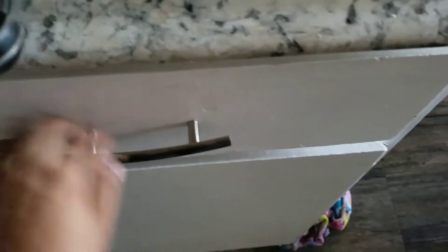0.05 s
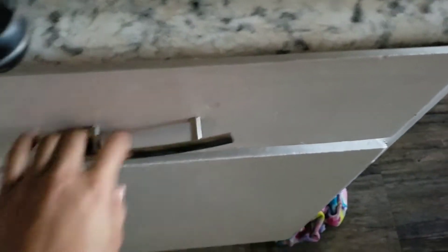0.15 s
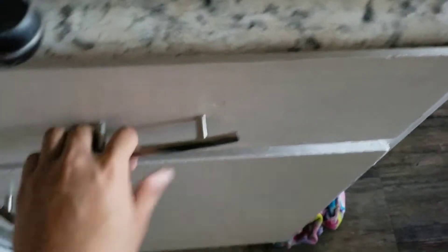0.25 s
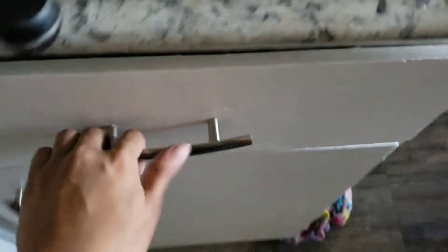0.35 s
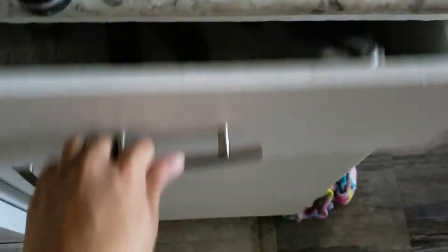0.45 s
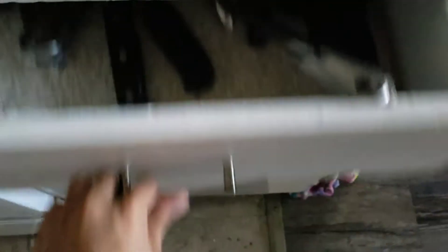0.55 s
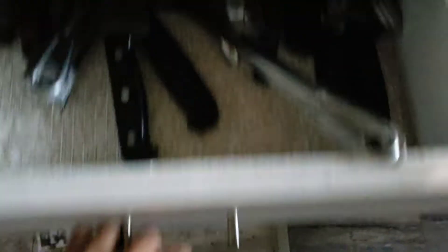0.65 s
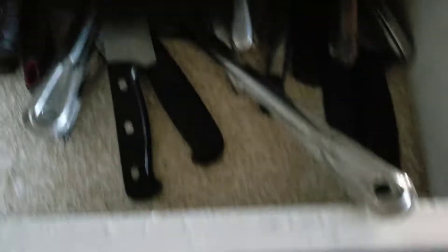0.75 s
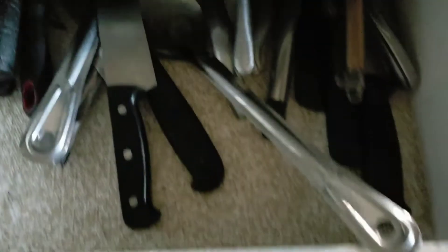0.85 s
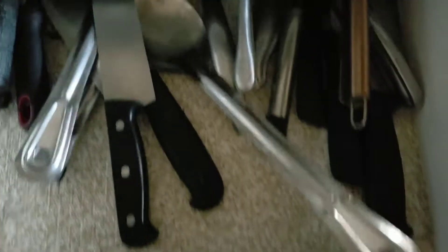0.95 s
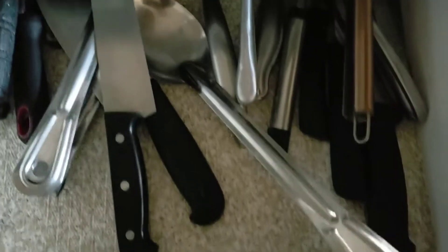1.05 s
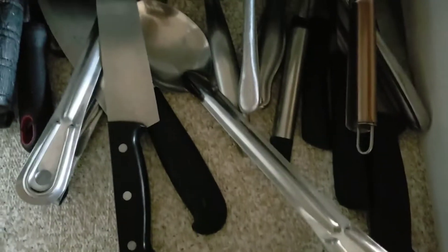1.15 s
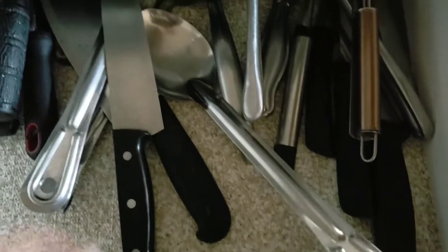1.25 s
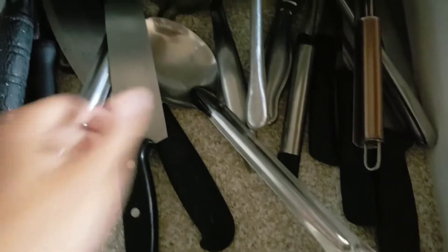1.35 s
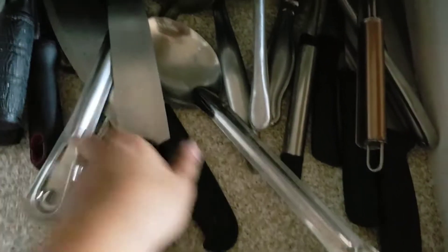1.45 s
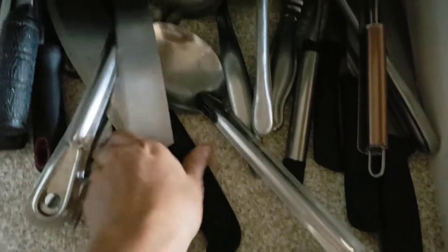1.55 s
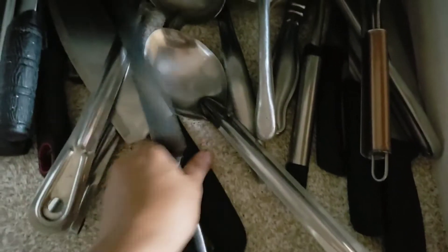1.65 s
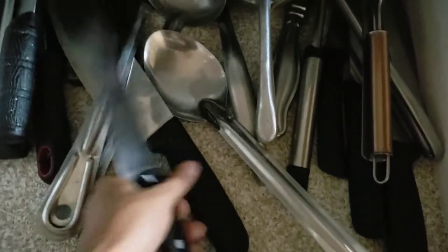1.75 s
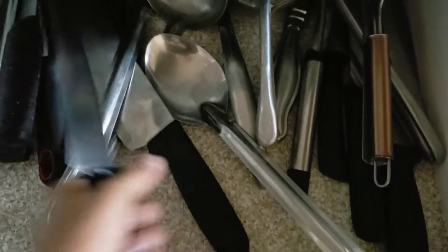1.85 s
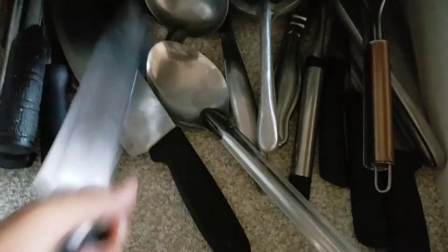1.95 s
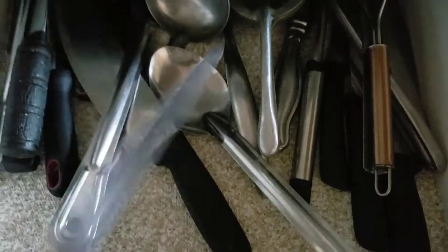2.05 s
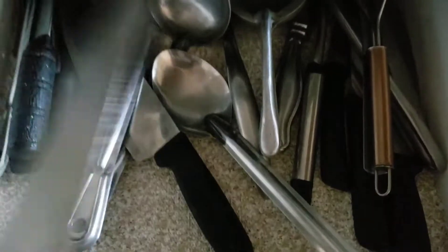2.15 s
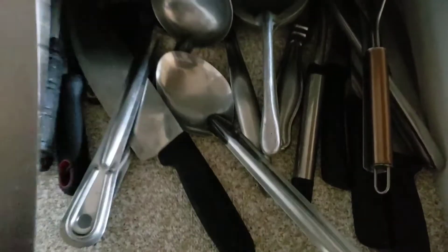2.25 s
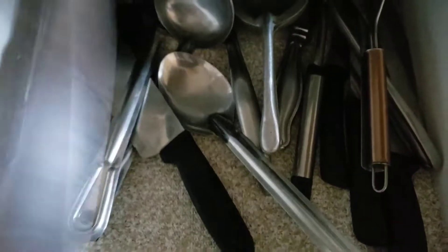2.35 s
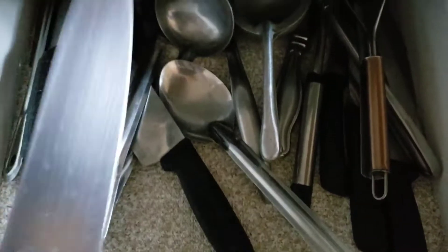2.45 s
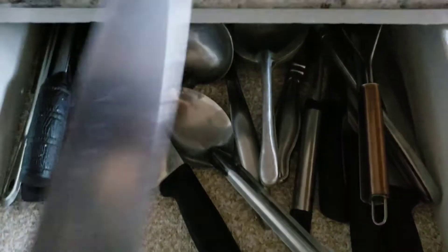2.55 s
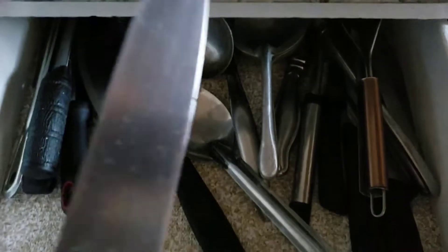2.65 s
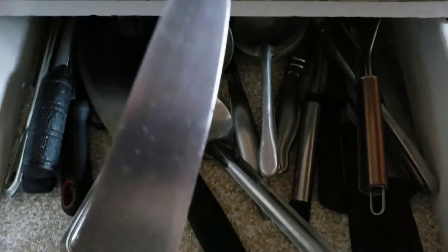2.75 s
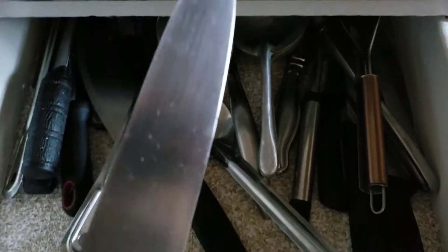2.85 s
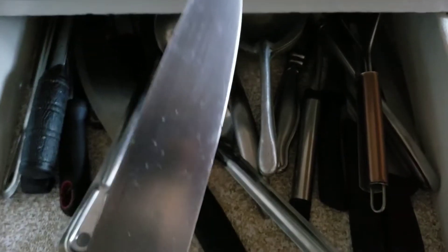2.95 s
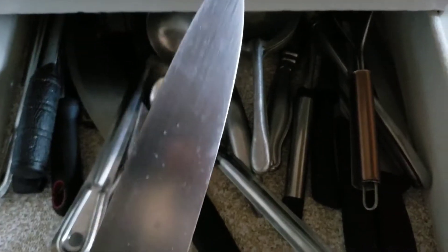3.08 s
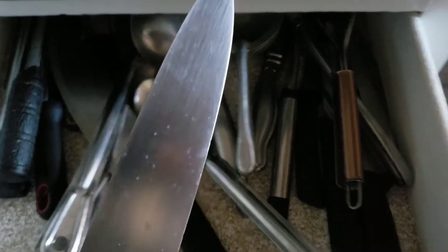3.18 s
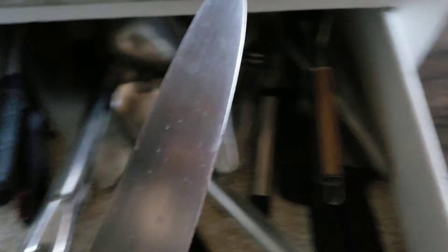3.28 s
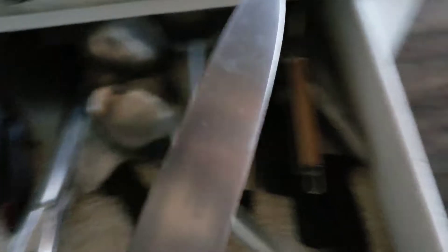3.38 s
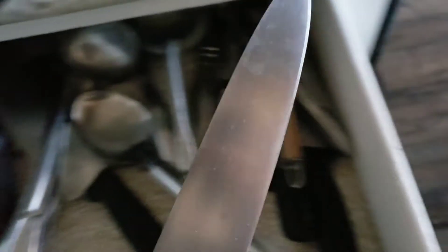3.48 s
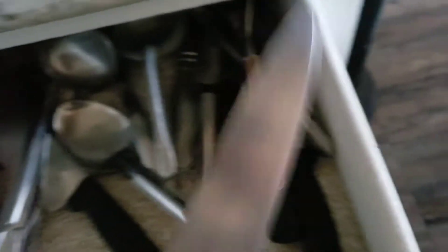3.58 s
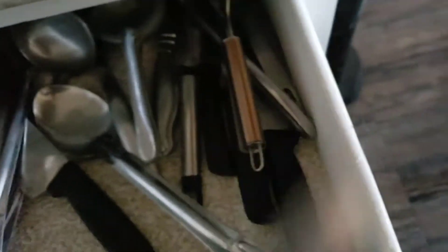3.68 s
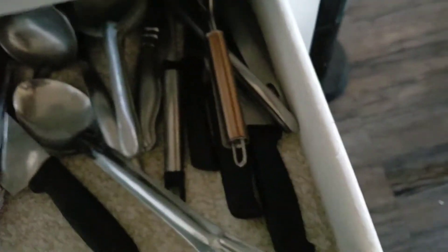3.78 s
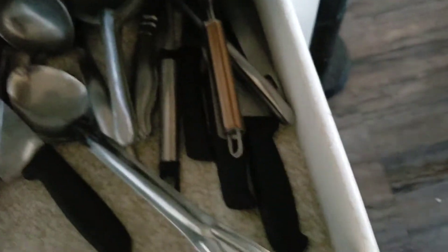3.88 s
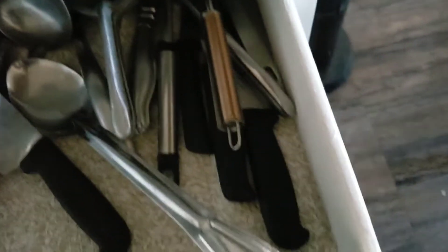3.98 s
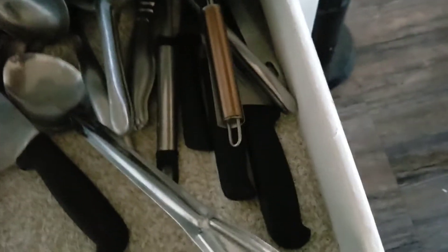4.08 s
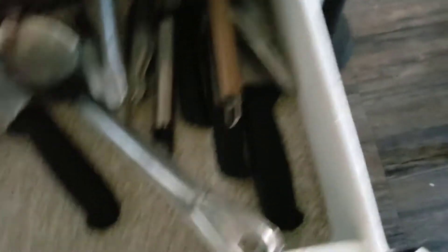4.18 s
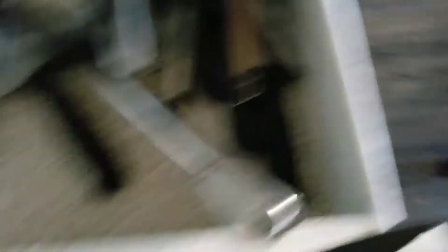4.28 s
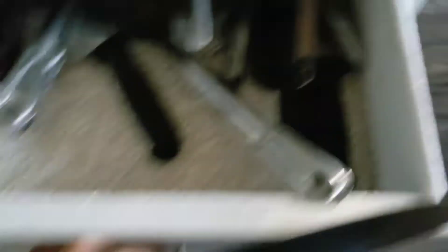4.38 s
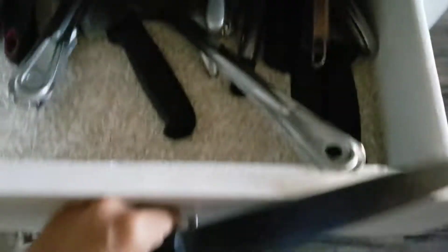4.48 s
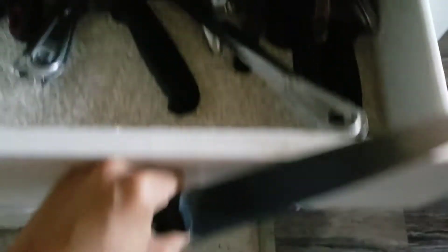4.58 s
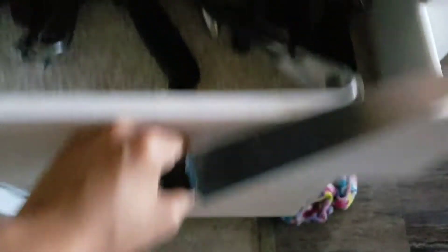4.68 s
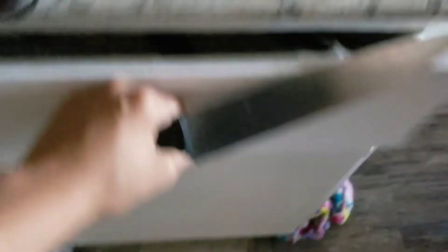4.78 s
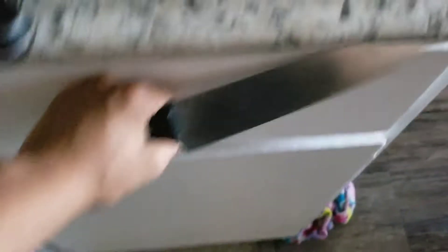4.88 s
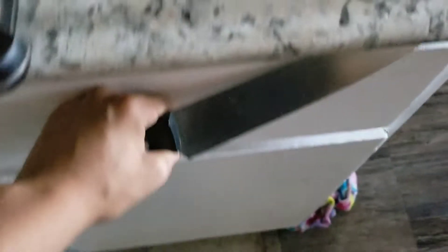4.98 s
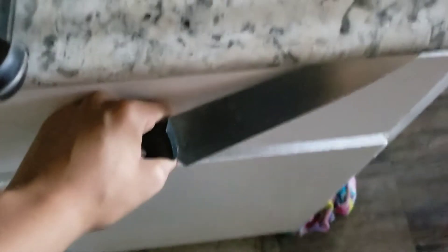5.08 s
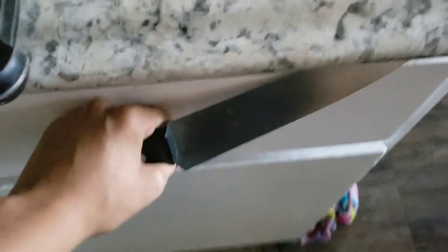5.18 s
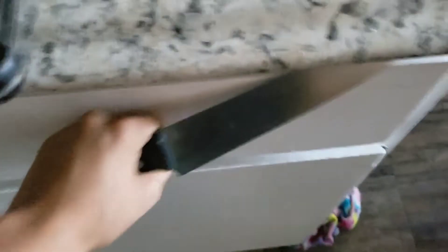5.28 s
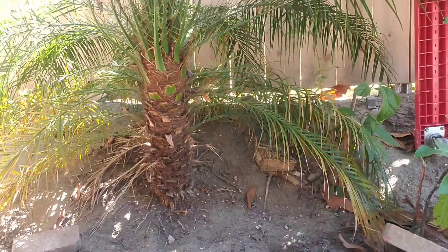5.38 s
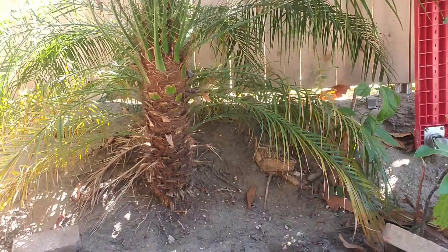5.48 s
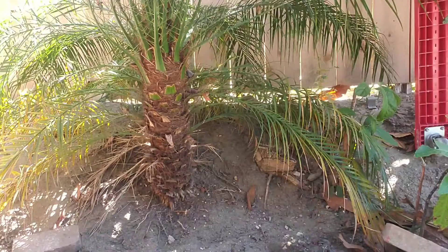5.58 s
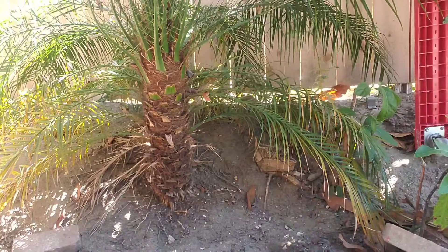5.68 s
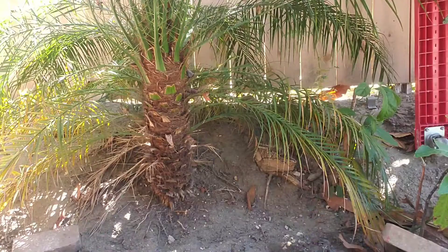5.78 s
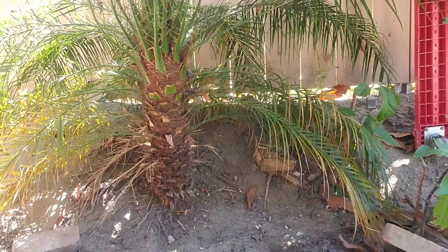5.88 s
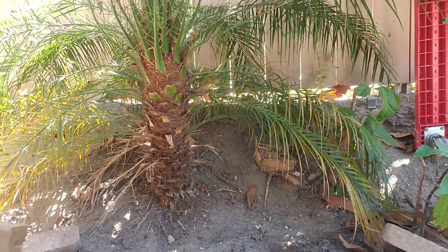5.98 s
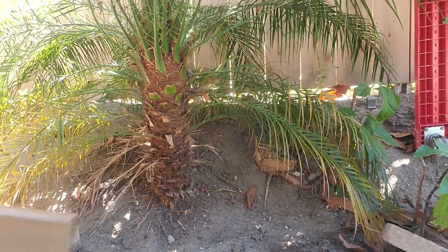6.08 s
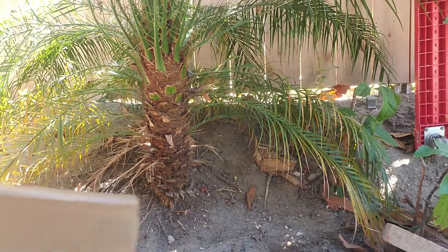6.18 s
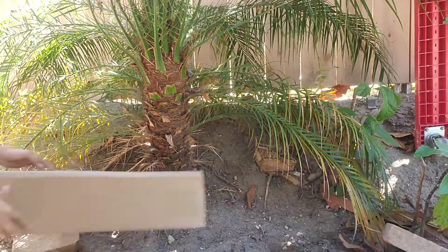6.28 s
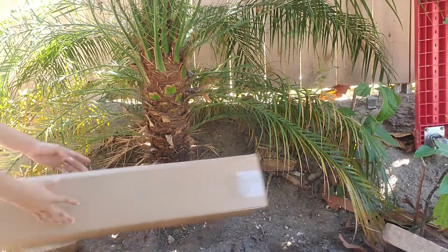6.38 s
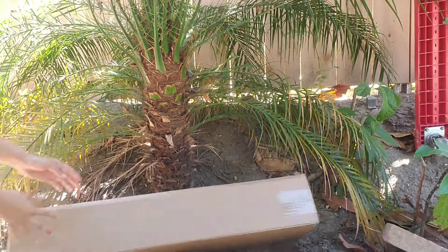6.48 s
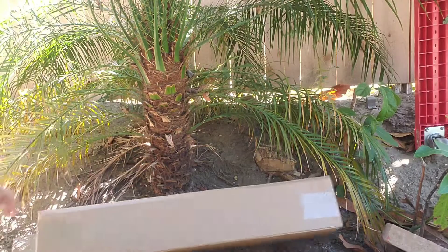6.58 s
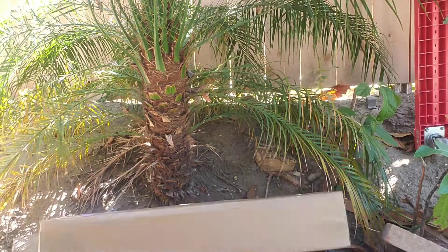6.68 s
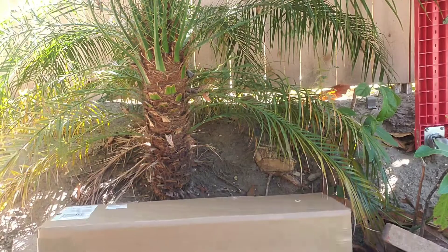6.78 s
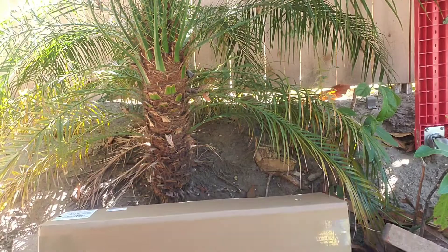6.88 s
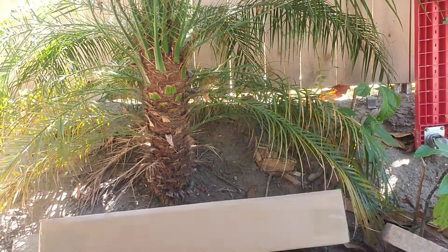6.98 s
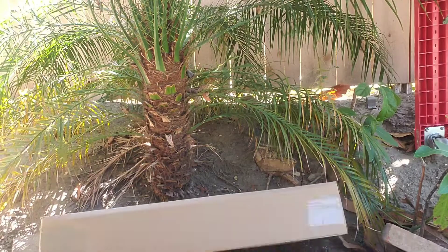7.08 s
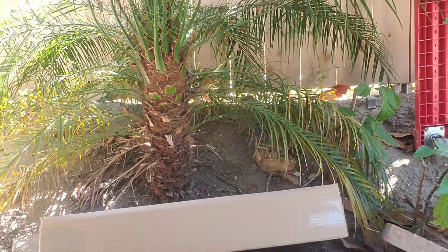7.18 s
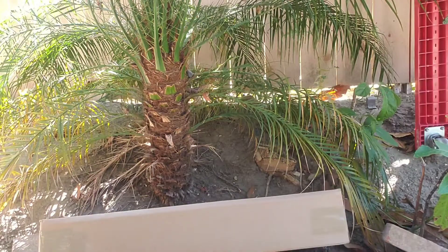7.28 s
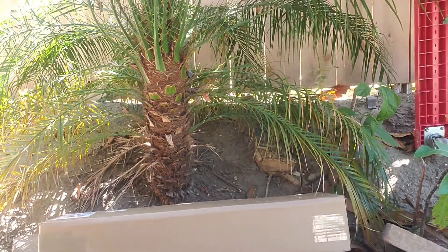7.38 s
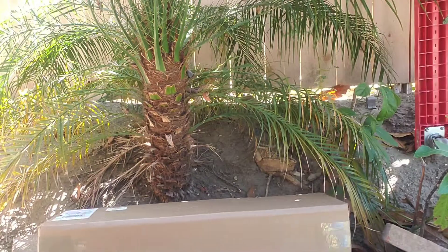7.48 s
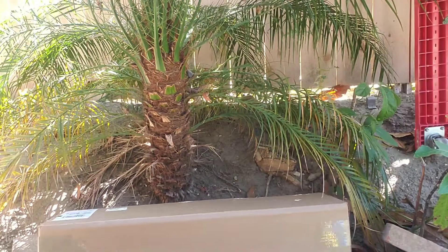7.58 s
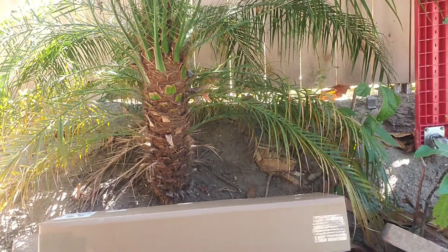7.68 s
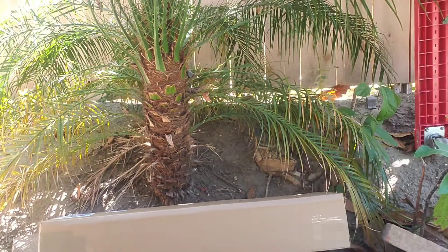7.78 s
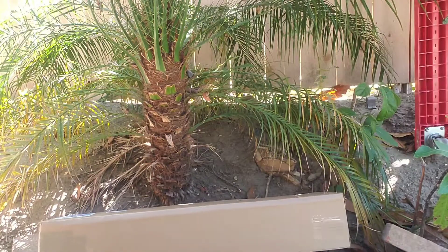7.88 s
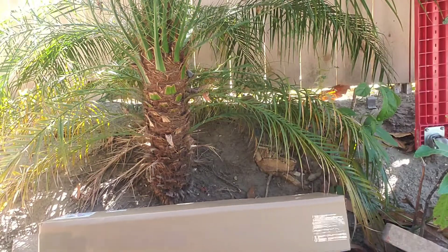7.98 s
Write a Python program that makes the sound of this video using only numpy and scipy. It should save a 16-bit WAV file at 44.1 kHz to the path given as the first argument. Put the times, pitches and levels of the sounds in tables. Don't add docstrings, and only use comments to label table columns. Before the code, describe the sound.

Close microphone, lightly reverberant room: drawer bumps, roller rumble and faint rail squeal, then busy metal clinks and a bright blade scrape. Near silence, two light knife taps, rolling, and a huge wooden slam with shimmering steel. After a tiny gap, outdoor rumble, dry leaf and grit rustle, crackling microphone dropouts, one big cardboard thud, smaller rocking bumps and a brief distant bird chirp.

```python
import sys
import numpy as np
from scipy import signal
from scipy.fft import rfft, irfft, next_fast_len
from scipy.io import wavfile
from scipy.ndimage import uniform_filter1d

SR = 44100
rng = np.random.default_rng(int(sys.argv[2]) if len(sys.argv) > 2 else 0)


def gain_from_db(level_db):
    decades = np.asarray(level_db, float) / 20
    return 10 ** decades


def wrap_up_sound(samples):
    columns = np.atleast_2d(samples).T
    tamed = np.clip(columns, -1, 1)
    steps = np.round(tamed * 32767).astype(np.int16)
    wavfile.write(sys.argv[1], SR, steps)


N = 354549
T = np.arange(N) / SR

# start_s, peak_db, clack_over_thud_db
OPENING_BLOWS = [(0.061, -38.5, -10), (0.122, -37, -13), (0.194, -31.5, -10.5), (0.239, -49, -15),
                 (0.326, -37, 9.5), (0.336, -28.5, -7), (0.504, -21.5, -14.5), (0.53, -26.5, -18),
                 (0.779, -29.5, -35), (0.794, -23.5, -31), (0.846, -24, -12), (0.89, -26, -17),
                 (1.04, -27, -13), (1.09, -31, -25), (1.192, -43, -27)]
CLOSING_BLOWS = [(3.044, -46.5, -23), (4.061, -32.5, -1.5), (4.257, -32, -21), (4.477, -23.5, -17),
                 (4.531, -19, -15), (4.651, -29.5, -26), (4.897, -21.5, -6), (4.908, -1.5, -4),
                 (4.931, 0.5, -33), (4.944, -7, -9.5), (4.959, -14.5, -6), (5.039, -20.5, -5.5),
                 (5.117, -21, -10.5)]
# freq_hz, density_db_per_hz
WOOD_COLOUR = [(21, -37), (35, -9.5), (245, -1.5), (309, -0.5), (510, -13.5), (926, -16.5), (3500, -32.5),
               (4550, -61.5), (7700, -120)]
# freq_hz, level_db, t60_s
DRAWER_MODES = [(95, -12, 0.11), (158, -5, .09), (240, -4, 0.073), (309.6, 0, 0.13), (426, -5, .07),
                (569, -2, 0.099), (665, -5, 0.037)]
# freq_hz, level_db, t60_s
SPOON_MODES = [(4037, -7, .12), (4570, -16, .1), (5240, -7, .1), (5430, -8, .16), (6105, -6, .13),
               (6422, -2, .08), (6610, -5, .13), (7257, -1, .09), (7903, -5, .1), (8737, -4, .14),
               (9335, -9, .1), (9771, -11, .12), (11470, -15, .1)]
# freq_hz, density_db_per_hz
EDGE_COLOUR = [(120, -40), (260, -6.5), (1100, -10), (2500, -13.5), (5200, -16), (9000, -26), (16000, -51)]
# freq_hz, density_db_per_hz
ROOM_COLOUR = [(15, -45), (25, -20.5), (45, -5.5), (123, -8), (400, -17.5), (3600, -29), (9000, -34.5),
               (16000, -51)]


def evened(x):
    return x / np.sqrt(np.mean(x ** 2) + 1e-20)


def read(points, hz):
    f, value = np.transpose(points)
    return np.interp(np.log(hz + 1), np.log(f + 1), value)


def coloured(points, lo_hz=0, hi_hz=30000):
    size = next_fast_len(N, True)
    hz = np.fft.rfftfreq(size, 1 / SR)
    edges = 1 / np.sqrt((1 + (lo_hz / (hz + 1)) ** 8) * (1 + (hz / hi_hz) ** 8))
    spectrum = rfft(rng.standard_normal(size)) * edges * gain_from_db(read(points, hz))
    return evened(irfft(spectrum, size)[:N])


def effort(rows):
    out = np.zeros(N)
    for start_s, db, rise_ms, hold_ms, t60_s in rows:
        hold_s = hold_ms / 1000
        part = out[round(start_s * SR):][:round((hold_s + 1.2 * t60_s) * SR)]
        t = T[:len(part)] + 1 / SR
        rise = (1 - np.exp(-t * 1000 / rise_ms)) ** 2
        part += rise * gain_from_db(db - 60 * np.maximum(t - hold_s, 0) / t60_s)
    return out


def lumpy(depth_db, size):
    jitter = evened(uniform_filter1d(rng.standard_normal(N), size=size))
    return evened(gain_from_db(depth_db * jitter))


def ring(force, modes, blow_db=-40):
    t = T[:SR // 3]
    body = np.zeros(len(t))
    for hz, db, t60_s in modes:
        beating = 1 + 0.58 * np.cos(2 * np.pi * hz * 0.0032 * t)
        body += gain_from_db(db - 60 * t / t60_s) * np.sin(2 * np.pi * hz * t) * beating
    onset = np.maximum(np.diff(force, prepend=0), 0)
    drive = force * rng.standard_normal(N) + gain_from_db(blow_db) * onset
    return signal.oaconvolve(drive, body / np.linalg.norm(body))[:N]


def struck(rows, colour, modes, ring_db, dry_db, blow_db):
    force = effort(rows)
    scatter = force * lumpy(2.5, size=60) * coloured(colour)
    return gain_from_db(dry_db) * scatter + gain_from_db(ring_db) * ring(force, modes, blow_db)


def hollow(rows, colour, modes, rise_ms, hold_ms, ring_db, dry_db, clack_db):
    thud = effort((s, db, rise_ms, hold_ms, t60_s * 0.82) for s, db, hard_db, t60_s in rows)
    clack = effort((s, db + hard_db, rise_ms * 0.46, hold_ms, t60_s * 1.13) for s, db, hard_db, t60_s in rows)
    boom = gain_from_db(ring_db) * ring(thud, modes, blow_db=31.5)
    boom += gain_from_db(dry_db) * thud * coloured(colour, hi_hz=900)
    return boom + gain_from_db(clack_db) * clack * lumpy(3.2, size=80) * coloured(colour, lo_hz=890)


def blows(rows):
    out, t = np.zeros(N), T[:SR // 5]
    for start_s, db, hz, t60_s in rows:
        out[round(start_s * SR):][:len(t)] += gain_from_db(db - 60 * t / t60_s) * np.sin(2 * np.pi * hz * t)
    return out


def singing(rows, size, steady=0.91):
    out = np.zeros(N)
    for start_s, length_s, hz0, hz1, db in rows:
        t = np.arange(0, length_s, 1 / SR)
        a, b = uniform_filter1d(rng.standard_normal((2, SR // 2)), size=size, axis=1)[:, :len(t)]
        phase = 2 * np.pi * np.cumsum(np.interp(t, [0, length_s], [hz0, hz1])) / SR
        tone = evened(a) * np.cos(phase) + (steady + evened(b)) * np.sin(phase)
        swell = np.sqrt(np.sin(np.pi * t / length_s))
        out[round(start_s * SR):][:len(t)] += gain_from_db(db) * swell * tone
    return out


def drawer_wood():
    # start_s, peak_db, clack_over_thud_db
    digging = [(1.509, -29, -6), (1.542, -20, -6.5), (1.564, -20, -10), (1.61, -25, -7), (1.648, -22, -8),
               (1.669, -17, -7), (1.69, -12.5, -8.5), (1.736, -16, 0), (1.797, -8, -14),
               (1.887, -20.5, -20), (1.92, -26, -12)]
    knocks = []
    for start_s, db, hard_db in OPENING_BLOWS + digging + CLOSING_BLOWS:
        t60_s = np.clip(0.073 - 0.2 * db, 0.03, 0.17)
        knocks.append((start_s, db, hard_db, t60_s))
    return hollow(knocks, WOOD_COLOUR, DRAWER_MODES, rise_ms=0.76, hold_ms=3.5,
                  ring_db=-11, dry_db=-8, clack_db=-7.5)


def utensils():
    # start_s, peak_db
    clatter = [(0.0618, -42), (0.1166, -38.5), (0.324, -26), (0.3384, -37), (0.3555, -27.5), (0.8097, -26),
               (0.859, -33), (0.9138, -30.5), (1.5089, -21), (1.6086, -14), (1.6894, -18), (1.8369, -21),
               (4.498, -26), (4.5494, -32.5), (4.607, -41), (4.714, -33)]
    # start_s, peak_db, rise_ms, hold_ms, t60_s
    scrapes = [
        (.08, -46, 8.1, 16, 0.054),
        (0.967, -30, 16, 29.5, 0.13),
        (1.52, -23.5, 9.5, 34, .09),
        (1.569, -25.5, 2.8, 2.2, .06),
        (1.613, -32, 2, 32, .1),
        (1.64, -22, 7.7, 27, 0.12),
        (1.695, -26, 4.5, 20, .1),
        (1.8, -28.5, 5, 5.1, 0.37),
    ]
    # start_s, peak_db, hold_ms, t60_s
    jolt = [
        (4.907, -21, 3.3, 0.22),
        (4.934, -16, 37, 0.2),
        (4.973, -26, 6.8, 0.099),
        (5.03, -50, 20, 0.94),
        (5.06, -39, 3, 0.11),
        (5.13, -33.5, 3.2, 0.15),
        (5.195, -44, 3.7, 0.072),
        (5.257, -44, 5, 0.1),
        (5.283, -50, 4.6, 0.088),
    ]
    # freq_hz, density_db_per_hz
    steel_colour = [(1180, -42), (2000, -10.5), (4940, -8), (5250, -8), (7120, -7.5), (9010, -9),
                    (16000, -32)]
    load_colour = [(1180, -33.5), (2000, -2), (3200, -6), (4150, -1), (4820, -5), (7500, -9), (9920, -5.5),
                   (16000, -27)]
    # freq_hz, level_db, t60_s
    ladle_modes = [(4131, -6, .25), (5435, -6, .45), (6191, -4, .42), (6395, -8, .5), (7020, -7, .45),
                   (8300, -9, .3), (8829, -14, .4), (9787, -6, .25), (10230, -12, .28), (10680, -14, .3),
                   (11210, -15, .35), (11920, -13, .25)]
    ticks = [(s, db - 11, 0.25, 2.5, 0.045) for s, db in clatter]
    pile = struck(ticks + scrapes, steel_colour, SPOON_MODES, ring_db=-9.5, dry_db=-6.5, blow_db=15.5)
    jumps = [(s, db, 0.7 * hold_ms, hold_ms, t60_s) for s, db, hold_ms, t60_s in jolt]
    return pile + struck(jumps, load_colour, ladle_modes, ring_db=-8.5, dry_db=-2.5, blow_db=12)


def knife():
    # start_s, peak_db, rise_ms, hold_ms, t60_s
    freed = [
        (1.7356, -6, .2, 2.5, .05),
        (1.739, -9, 2, 25, 0.069),
    ]
    # freq_hz, density_db_per_hz
    keen_colour = [(590, -40.5), (1000, -11.5), (3270, -15), (4020, -9), (4900, -17.5), (5250, -5.5),
                   (7100, -1.5), (8960, -6), (16000, -26.5)]
    # start_s, peak_db, rise_ms, hold_ms, t60_s
    click = [
        (3.808, -28, .1, 4.3, 0.052),
        (4.062, -31, .1, 1.5, 0.034),
    ]
    # start_s, peak_db, rise_ms, hold_ms, t60_s
    taps = [
        (3.808, -26, 0.051, 8, 0.06),
        (3.8165, -21, 0.029, 3, 0.09),
        (3.822, -33, 4, 40, .36),
    ]
    # start_s, peak_db, rise_ms, hold_ms, t60_s
    raps = [
        (3.98, -30.5, 1.2, 3.8, 0.084),
        (3.984, -25.5, 0.5, 11.6, 0.05),
        (4.011, -35, 0.54, 7, 0.056),
        (4.0, -42.5, 6, 22, 0.37),
    ]
    # freq_hz, level_db, t60_s
    blade_modes = [(290, -7, .2), (484, -15, .2), (861, -7, .36), (1104, 0, .22), (1265, -7, .16),
                   (1720, -15, .24), (2509, -23, .3), (3149, -23, .3), (3860, -11, .26), (4043, -11, .26),
                   (5160, -8, .12), (6632, -12, .16), (7515, -17, .22), (8400, -19, .22)]
    front_modes = [(382, 0, .1), (673, -9.5, 0.086), (742, -3, 0.097), (910, -9, 0.14), (1030, -2, 0.064),
                   (1389, -5, .05), (1520, -8, 0.067), (1793, 2, .045), (1950, -8, 0.043),
                   (2180, -3, 0.032), (2610, -11, 0.057), (4130, -11.5, .07), (5290, -8, .045),
                   (8683, -13.5, 0.041)]
    out = struck(freed, keen_colour, SPOON_MODES, ring_db=-5.5, dry_db=-8.5, blow_db=14)
    out += effort(click) * coloured(EDGE_COLOUR, lo_hz=1500)
    out += struck(taps, EDGE_COLOUR, blade_modes, ring_db=-11, dry_db=-8, blow_db=43)
    return out + struck(raps, EDGE_COLOUR, front_modes, ring_db=0, dry_db=-9, blow_db=27)


def panels_and_pings():
    # start_s, peak_db, freq_hz, t60_s
    single_blows = [(.509, -23.5, 153, 0.088), (.795, -21, 430, 0.047), (.846, -16, 188, 0.076),
                    (1.566, -17.5, 326.6, 0.1), (1.688, -15.5, 324, 0.073), (1.7975, -3, 582, 0.045),
                    (1.798, -9.5, 217, .06), (1.798, -14.5, 760, .045), (1.8375, -24, 7000, 0.023),
                    (1.52, -26, 300, .05), (1.555, -27, 1800, .06), (1.668, -21, 654, .08),
                    (1.69, -24, 1247, 0.065), (4.063, -28, 263, 0.057), (4.908, -6.5, 613, 0.02),
                    (1.512, -32, 8200, .05), (1.562, -31, 4100, .08), (1.57, -31, 6600, .06),
             (1.689, -31, 9900, .04), (1.706, -33, 8100, .04), (3.8165, -33, 5180, 0.099),
             (3.8165, -41, 4370, .3), (3.985, -23.5, 1027, 0.097), (3.983, -22, 2200, .05),
             (4.498, -48, 8100, .05), (4.911, -26, 7770, 0.055), (5.134, -37, 6200, 0.32)]
    return blows(single_blows)


def rail_squeal():
    # start_s, peak_db, rise_ms, hold_ms, t60_s
    squeal = [
        (.87, -41, 9.2, 46, 0.27),
        (.955, -33, 8.7, 42, 0.14),
        (4.3, -49, 33, 60, 0.31),
        (4.8, -47, 4.5, 15, 0.12),
    ]
    # freq_hz, level_db, t60_s
    rail_modes = [(1390, -0.5, 0.0084), (1804, -2, 0.032), (2060, -7, 0.017), (2060, -5, 0.019)]
    return ring(effort(squeal), rail_modes)


def runners():
    # time_s, speed_below_full_db
    rolls = [
        [(0.325, -6.5), (0.537, -0.5), (0.937, 0), (1.16, -12.5), (1.36, -31)],
        [(4.06, -19), (4.298, -5), (4.472, -4), (4.92, -4)],
    ]
    # freq_hz, density_db_per_hz
    runner_colour = [(18, -35.5), (30, -5), (141, 4.5), (540, -11), (616, -25), (1100, -20), (8080, -37.5),
                     (16000, -66)]
    box_shake = evened(ring(lumpy(1.1, size=500), DRAWER_MODES[2:5]))
    rumble = 0.59 * box_shake + 0.52 * coloured(runner_colour, hi_hz=498)
    rattle = lumpy(2.5, size=200) * coloured(runner_colour, 500, 2380)
    hiss = lumpy(2.7, size=100) * coloured(runner_colour, lo_hz=2964)
    # full_speed_db, db_per_speed_db, sound
    layers = ((-36, 1.5, rumble), (-42.5, 0.9, rattle), (-52, 1.23, hiss))
    out = np.zeros(N)
    for rows in rolls:
        time_s, speed_db = np.transpose(rows)
        moving = np.clip(np.minimum(T - time_s[0], time_s[-1] - T) / 0.015, 0, 1)
        speed = np.interp(T, time_s, speed_db)
        for db, share, sound in layers:
            out += moving * gain_from_db(db + share * speed) * sound
    return out


def cabinet():
    shove = effort((s, db, 3, 12, 0.2) for s, db, hard_db in OPENING_BLOWS + CLOSING_BLOWS[2:])
    return gain_from_db(-16.5) * shove * coloured(WOOD_COLOUR, lo_hz=61, hi_hz=128)


def rubbed_panels():
    # start_s, length_s, start_hz, end_hz, level_db
    tones = [(.33, 0.047, 798, 791, -40.5), (0.423, 0.067, 1720, 1650, -51), (.51, 0.097, 802, 828, -43),
             (.52, .07, 520, 494, -35.5), (.59, 0.086, 1160, 1110, -45), (0.743, 0.085, 301, 280, -40),
             (0.961, 0.073, 1403, 1447, -39.5), (0.999, .22, 350.2, 336.8, -41),
             (1.049, 0.094, 1050, 1022, -50.5), (3.76, 0.038, 4850, 4750, -67),
             (4.79, 0.044, 1070, 1120, -50.5), (3.1, .25, 120, 120, -62), (1.875, 0.068, 269.4, 240, -28.5),
             (4.203, 0.12, 329.6, 299, -45), (4.45, 0.12, 329.6, 322.5, -41),
             (6.968, 0.051, 1450, 1445, -56.5), (6.995, 0.19, 950, 970, -63.5)]
    return singing(tones, size=700)


def whistles_and_glides():
    # start_s, length_s, start_hz, end_hz, level_db
    whistles = [
        (2.425, .08, 4800, 4800, -81),
        (2.47, .07, 3100, 3200, -83),
        (2.735, .055, 3700, 3650, -80),
        (2.845, .08, 3510, 3480, -81),
        (5.075, .06, 5430, 5430, -48),
        (5.155, .05, 5430, 5430, -50),
        (5.155, .1, 7050, 7100, -57),
        (5.275, 0.05, 4400, 4450, -59),
    ]
    # start_s, length_s, start_hz, end_hz, level_db
    glides = [
        (4.13, .2, 10100, 9800, -69),
        (4.2, .11, 13900, 14100, -74),
        (4.25, 0.28, 6750, 7350, -62),
        (4.69, 0.15, 5600, 5600, -61),
    ]
    return singing(whistles, size=300) + singing(glides, size=60, steady=0)


def hand():
    # start_s, peak_db, rise_ms, hold_ms, t60_s
    grip = [
        (2.72, -74, 4, 150, .5),
        (3.05, -74, 20, 60, .3),
        (3.4, -74, 19, 60, .3),
        (5.2, -56, 5, 15, .1),
        (5.28, -49, 5, 25, .1),
    ]
    # start_s, peak_db, rise_ms, hold_ms, t60_s
    stir = [
        (1.05, -50, 40, 150, 0.46),
        (1.52, -48, 30, 350, .4),
        (2.045, -51, 5.3, 25, 0.22),
        (2.32, -62, 20, 80, .4),
        (4.25, -43, 15, 60, .4),
        (4.62, -42, 29.7, 120, .3),
    ]
    fingers = effort(grip) * coloured(EDGE_COLOUR, lo_hz=1800, hi_hz=5000)
    return fingers + effort(stir) * coloured(ROOM_COLOUR, hi_hz=90)


def kitchen(x):
    # freq_hz, t60_s
    decay = [(100, 0.41), (1000, 0.48), (12000, 0.22)]
    size = SR // 2
    echoes = rng.choice([-1., 1.], size) * (rng.random(size) < 0.05) * (T[:size] > 0.004)
    hz, t, z = signal.stft(echoes, SR, nperseg=256)
    tail = signal.istft(z * gain_from_db(-60 * t / read(decay, hz)[:, None]), SR, nperseg=256)[1]
    return signal.oaconvolve(x, tail / np.linalg.norm(tail))[:N]


def cardboard_box():
    # start_s, peak_db, slap_over_thud_db, t60_s
    bumps = [(5.382, -37, -10, 0.56), (6.526, 0.5, -14.5, 0.23), (6.538, -13, -20, 0.12),
             (6.56, -6, -6.5, 0.11), (6.573, -7.5, -10.5, 0.25), (6.663, -15, -18, 0.31),
             (6.701, -18, -16.5, 0.13), (6.754, -35.5, 14, 0.13), (6.801, -25, -12, 0.2),
             (6.852, -25.5, -18, 0.18), (6.921, -21, -16.5, 0.18), (6.987, -33, -16, 0.055),
             (7.147, -42.5, 5, 0.26), (7.513, -37.5, -8.5, 0.095), (7.588, -44, 5.5, 0.071)]
    # freq_hz, density_db_per_hz
    card_colour = [(21, -30), (35, -10), (146, -1.5), (510, -5), (655, -12), (962, -21), (3500, -28.5),
                   (4550, -48), (7700, -120)]
    # freq_hz, level_db, t60_s
    box_modes = [(84.7, -4, 0.36), (155.4, 9, 0.13), (237, -8, 0.056), (339, -1.5, 0.084),
                 (425, 1.5, 0.055), (648, 2, 0.084)]
    # start_s, peak_db, freq_hz, t60_s
    box_blows = [
        (6.597, -21, 1700, .05),
        (6.757, -26.5, 1370, 0.047),
        (6.755, -31, 2430, 0.061),
        (6.82, -33, 350, .05),
        (6.853, -27.5, 620, 0.048),
        (6.925, -31, 482, 0.067),
    ]
    thuds = hollow(bumps, card_colour, box_modes, rise_ms=1.4, hold_ms=5.4,
                   ring_db=-9, dry_db=-8, clack_db=-10.5)
    return signal.lfilter(*signal.butter(2, 65, "high", fs=SR), thuds) + blows(box_blows)


def grit_and_fingers():
    # start_s, peak_db, t60_s
    rustle = [(5.375, -55.5, 0.73), (5.535, -54.5, 0.23), (5.842, -65, 0.019), (6.054, -36.5, 0.3),
              (6.13, -56, 1), (6.29, -45, 1), (6.375, -38, 0.34), (6.518, -20, 0.4), (6.563, -25.5, 0.077),
              (6.66, -47, 0.56), (6.756, -32, 0.083), (7.038, -53, 0.029), (7.065, -51.5, 0.033),
              (7.105, -53.5, 0.45), (7.15, -57, 0.14), (7.523, -56.5, 0.044), (7.586, -54, 0.05),
              (7.674, -52.5, 0.23), (7.995, -60.5, 0.11)]
    # start_s, peak_db, rise_ms, hold_ms, t60_s
    handling = [
        (6.06, -40, 8, 25, 0.12),
        (6.14, -51.5, 23, 94, 0.39),
        (6.25, -49.5, 17, 60, 0.37),
        (6.36, -40.5, 18, 67, 0.14),
    ]
    # freq_hz, density_db_per_hz
    grit_colour = [(1200, 8), (2500, 0), (5000, 4), (8000, -3), (14000, -17), (16500, -27)]
    slide_colour = [(880, -28), (1500, -1), (2060, -13), (4920, -8), (6630, -4), (7170, -3), (9010, -15),
                    (11900, -13), (16000, -31)]
    rows = []
    for start_s, db, t60_s in rustle:
        rise_ms = min(20 * t60_s, 4.7)
        rows.append((start_s, db, rise_ms, 5 * rise_ms, t60_s))
    grit = effort(rows) * lumpy(2.8, size=40) * coloured(grit_colour)
    return grit + effort(handling) * lumpy(2.6, size=50) * coloured(slide_colour)


def contact():
    twice = [5.929, 6.0049, 6.0686, 6.1864, 6.229, 6.2736, 6.3896, 6.4337, 6.4787]
    once = [5.9785, 6.0437]
    middling = [6.4037, 6.4306, 6.4427, 6.4507, 6.4807, 6.5107, 6.5187, 6.7017, 6.8217]
    brief = [5.9934, 6.0118, 6.1132, 6.114, 6.2335, 6.2545, 6.3174, 6.3352, 6.3794, 6.4378, 6.7559]
    flicks = [5.9314, 5.9528, 6.3223, 6.3586, 6.9768]
    # start_s, spacing_ms, bounces
    chatter = [(5.9327, 0.71, 4), (6.1123, 0.16, 5), (6.1735, 0.15, 3), (6.3175, 0.24, 6), (6.3199, 0.5, 2),
               (6.3324, 0.23, 4), (6.3348, 0.25, 5), (6.347, 0.26, 5), (6.3534, 0.38, 5),
               (6.3756, 0.39, 10)]
    long_ms, again_s = 1.72, 0.0203
    slow = [(s, long_ms) for s in twice + once] + [(s + again_s, long_ms) for s in twice]
    slow += [(s, 1.0) for s in middling] + [(s, 0.33) for s in brief]
    quick = [(s, 0.07) for s in flicks]
    for start_s, spacing_ms, count in chatter:
        for k in range(int(count)):
            bounce_s = start_s + (k + rng.uniform(-0.4, 0.4)) * spacing_ms / 1000
            quick.append((bounce_s, rng.uniform(0.025, 0.11)))
    volts = np.zeros((2, N))
    for line, breaks in zip(volts, (slow, quick)):
        for start_s, length_ms in breaks:
            first = round(start_s * SR)
            line[first:first + max(round(length_ms * SR / 1000), 1)] = -1
    soft = 0.63 * signal.lfilter(*signal.butter(1, 4000, fs=SR), volts[0]) + 0.49 * volts[0]
    steps = (soft + gain_from_db(-2) * volts[1]) * gain_from_db(-19.5)
    return signal.lfilter(*signal.butter(2, 105, "high", fs=SR), steps)


def birds():
    # start_s, length_s, start_hz, end_hz, level_db
    calls = [(5.467, 0.065, 5286, 5000, -62), (5.479, .08, 4016, 3800, -64), (5.71, 0.068, 3450, 3160, -65),
             (6.857, 0.013, 4450, 4380, -50.5), (6.871, 0.041, 3450, 3670, -50.5),
             (6.877, 0.047, 3200, 3130, -55), (6.907, 0.019, 4300, 4810, -45),
             (6.93, 0.011, 4400, 4170, -45), (6.931, 0.0294, 3650, 3500, -47),
             (6.954, 0.03, 2900, 3280, -53), (6.963, 0.015, 3700, 3590, -50),
             (6.992, 0.034, 3350, 3320, -57.5)]
    out = np.zeros(N)
    for start_s, length_s, hz0, hz1, db in calls:
        t = np.arange(0, length_s + 0.04, 1 / SR)
        waver, wobble = uniform_filter1d(rng.standard_normal((SR // 4, 2)), size=70, axis=0)[:len(t)].T
        shape = np.minimum(t / 0.0051, 1) * gain_from_db(-800 * np.maximum(t - length_s, 0))
        phase = 2 * np.pi * np.cumsum(np.interp(t, [0, length_s], [hz0, hz1])) / SR
        smeared = evened(waver) * np.cos(phase) + evened(1.3 + evened(wobble)) * np.sin(phase)
        out[round(start_s * SR):][:len(t)] += gain_from_db(db) * shape * smeared
    return out


def air(rows, colour, hiss_db):
    level = gain_from_db(np.interp(T, *np.transpose(rows)))
    low = lumpy(1.4, size=4000) * coloured(colour, hi_hz=1200)
    high = lumpy(1.5, size=3000) * coloured(colour, lo_hz=1200)
    return level * low + (level * gain_from_db(hiss_db) + gain_from_db(-82)) * high


def kitchen_air():
    # time_s, level_db
    indoors = [(0.0, -60), (0.12, -52), (0.31, -54), (1.37, -55), (2.07, -60.5), (2.534, -68), (2.87, -64),
               (3.64, -59), (3.79, -57), (4.9, -42), (5.21, -40), (5.32, -40.5)]
    return air(indoors, ROOM_COLOUR, hiss_db=-14)


def yard_air():
    # time_s, level_db
    outdoors = [(5.39, -48), (5.528, -46), (5.92, -41), (7.01, -41), (7.2, -46.5), (8.04, -45)]
    # freq_hz, density_db_per_hz
    yard_colour = [(15, -49), (25, -13.5), (114, 4), (309, -15.5), (1370, -30.5), (2050, -37.5),
                   (7510, -46), (16000, -67)]
    return air(outdoors, yard_colour, hiss_db=-19.5)


def scene():
    near = drawer_wood() + utensils() + knife() + rail_squeal() + panels_and_pings()
    rubbed = rubbed_panels()
    housed, free = (signal.lfilter(*signal.butter(3, hz, "high", fs=SR), near) for hz in (110, 165))
    pulled_out = (T > 1.4) & (T < 4.05)
    near = np.where(pulled_out, free, housed) + runners() + rubbed
    inside = near + gain_from_db(-12) * kitchen(near) + kitchen_air()
    inside += cabinet() + hand() + whistles_and_glides()
    outside = cardboard_box() + rubbed + grit_and_fingers() + contact() + birds() + yard_air()
    cut_s, back_s = 5.322, 5.372
    fade_out = np.clip((cut_s - T) / 0.0019, 0, 1)
    fade_in = np.clip((T - back_s) / 0.035 + 1, 0, 1) ** 2
    return (inside * fade_out + outside * fade_in)[None]


def roll_off(x):
    return signal.sosfilt(signal.butter(12, 16590, fs=SR, output="sos"), x)


def record(dry):
    squashed = dry / (1 + abs(dry) ** 4) ** (1 / 4)
    mix = signal.oaconvolve(squashed, signal.firwin(95, 15750, fs=SR)[None], "same")
    return roll_off(mix)


dry = scene()
out = record(dry)
wrap_up_sound(out)
```